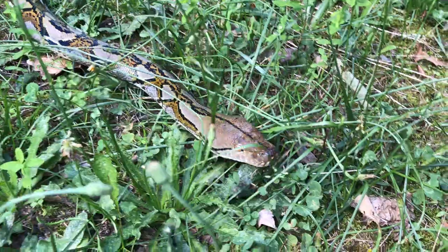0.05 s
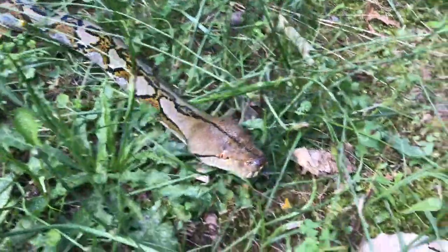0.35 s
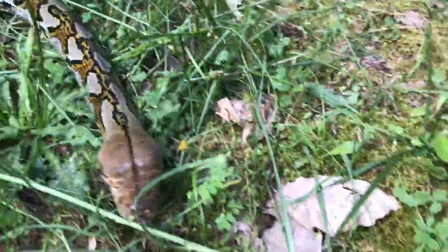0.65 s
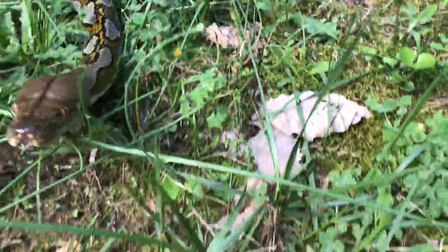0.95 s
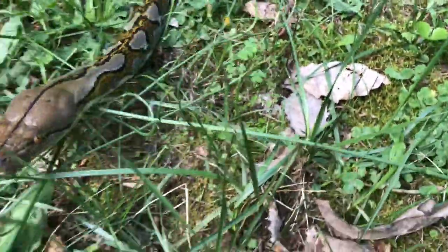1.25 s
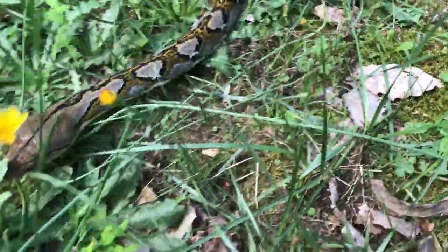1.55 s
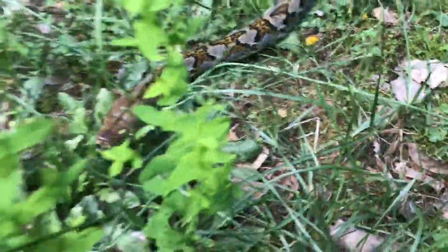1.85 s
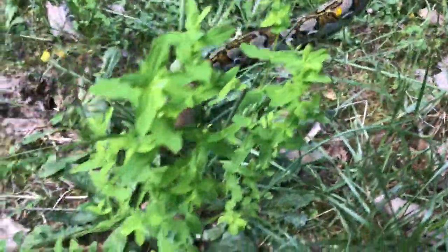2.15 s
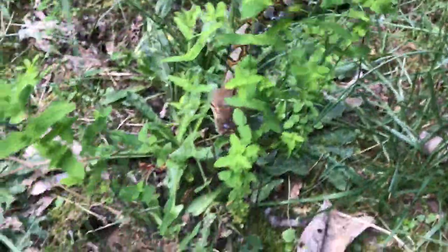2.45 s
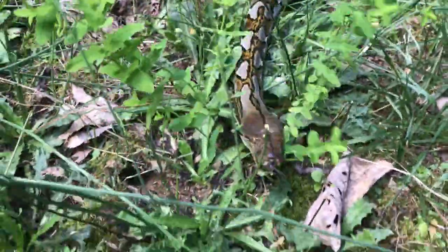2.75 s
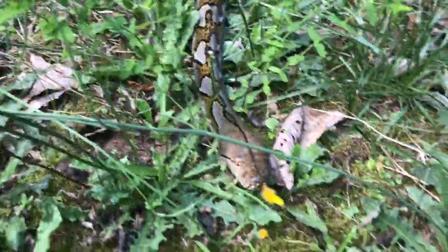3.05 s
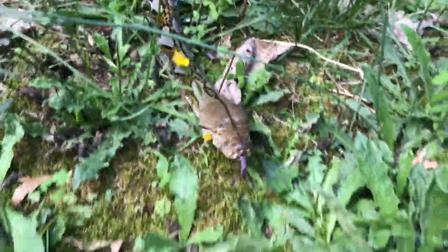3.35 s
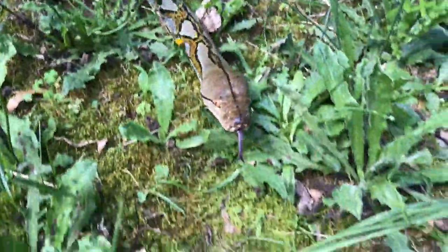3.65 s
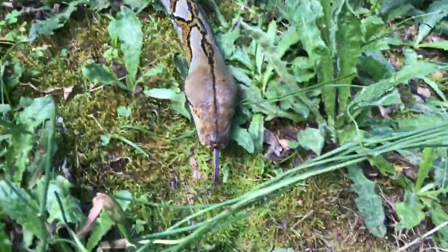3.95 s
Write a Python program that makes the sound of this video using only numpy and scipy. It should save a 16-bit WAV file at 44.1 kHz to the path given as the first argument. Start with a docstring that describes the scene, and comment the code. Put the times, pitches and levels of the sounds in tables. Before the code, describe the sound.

Grass rustles softly close by as a large snake slides along and a person walks beside it. The swishing and ticking grow louder after 1 second, and stems buckle near 1.7 seconds. Dry stalks snap in a cluster around 2.5 seconds, and a footstep crushes a dead leaf near 3.8 seconds. Faint wind, a distant engine and a low hum continue underneath, with two thin, far trills early on.

```python
"""A large snake slides through grass and dry leaves; a person walks close beside it.
From the start: faint wind, a distant engine, electrical hum; two thin far trills by 1.7 s.
Blades swish and tick, louder after 1 s; turf is pressed, green stems buckle near 1.7 s.
Dry stalks snap in a cluster around 2.5 s. Near 3.8 s one footstep crushes a dead leaf."""
import sys
import numpy as np
from scipy import signal
from scipy.fft import rfft, irfft, next_fast_len
from scipy.io import wavfile
from scipy.ndimage import map_coordinates

SR = 44100
rng = np.random.default_rng(int(sys.argv[2]) if len(sys.argv) > 2 else 0)


def inscribe(sig):
    """Save sig as 16-bit PCM at rate SR to the path in sys.argv[1].

    A 1-D sig is mono; a 2-D sig holds one channel per row.
    Samples are clipped to [-1, 1] before scaling.
    """
    pcm = np.round(np.clip(np.atleast_2d(sig).T, -1, 1) * 32767)
    wavfile.write(sys.argv[1], SR, pcm.astype(np.int16))


N = 176400

# steady sliding: t/s, level/dB
SLIDE_LEVEL = [(0, -72), (1.05, -65), (1.5, -60), (2.5, -62), (3.35, -64), (4, -60.5)]
# strokes through grass: peak t/s, half length/s, level/dB, treble gain/dB
GRASS_STROKES = [(0.49, 0.27, -67.5, 6.5), (0.853, 0.04, -65.5, 2), (1.183, 0.016, -57, -11),
                 (1.264, 0.069, -56, 1), (1.603, 0.019, -63, 12), (1.774, 0.13, -58, -3),
                 (2.087, 0.041, -52, 2), (2.304, 0.067, -54, -2), (2.373, 0.027, -54, 6),
                 (2.474, 0.041, -50.5, 2), (2.604, 0.013, -54.5, 7), (2.725, 0.05, -58, 6),
                 (3.066, 0.14, -63, 8), (3.515, 0.046, -52.5, -7), (3.57, 0.04, -52.5, 5),
                 (3.733, 0.09, -53.5, -2.5)]
# rustle spectrum: f/Hz, relative level/dB
GRASS_SPECTRUM = [(150, -74), (500, 1), (1500, -1.5), (2600, -0.5), (3800, 1.5), (4900, -2), (6300, 0.5),
                  (8200, -3), (10500, -0.5), (13500, -5), (16000, -9)]
# dry stalks and leaves breaking: t/s, level/dB, centre f/Hz, t60/s
DRY_SNAPS = [(.737, -45, 9700, 0.0044), (0.784, -49, 6500, 0.006), (0.841, -48.5, 5800, 0.0091),
             (1.3811, -48.5, 6830, 0.0046), (1.388, -43, 7400, 0.0094), (2.3092, -47, 4000, .008),
             (2.3261, -37.5, 4130, 0.012), (2.429, -43.5, 5500, .005), (2.4603, -37, 5800, 0.0061),
             (2.4682, -39, 7150, .005), (2.4746, -29.5, 12700, 0.0013), (2.4799, -38, 5460, 0.004),
             (2.511, -42, 6600, 0.0068), (2.5183, -36, 6350, 0.0077), (2.526, -37.5, 6640, 0.017),
             (2.5667, -40, 7400, 0.0035), (2.575, -37, 8800, 0.01), (2.584, -43, 7500, 0.007),
             (2.601, -39, 6550, 0.0089), (2.674, -35.5, 7800, 0.027), (2.7202, -41, 5600, 0.011),
             (2.9756, -33, 6340, .003), (3.045, -46.5, 6500, 0.0031), (3.123, -44.5, 9500, 0.0041),
             (3.197, -43.5, 10500, .009), (3.3275, -38.5, 4950, .009), (3.6718, -34, 4070, 0.041),
             (3.6745, -27, 3650, 0.011), (3.7345, -46.5, 7000, 0.011), (3.771, -28, 5340, 0.0087),
             (3.7743, -27, 7300, 0.0066), (3.782, -35, 6400, 0.022), (3.793, -31.5, 7000, 0.029),
             (3.7977, -31.5, 5900, 0.012), (3.8324, -29, 7800, 0.0092), (3.844, -34.5, 12100, 0.0081),
             (3.930, -46, 5660, 0.011), (3.987, -42, 7900, 0.008), (3.9956, -40.5, 5800, 0.0063)]
# leaves scraped or crushed: t/s, level/dB, rise/s, hold/s, release t60/s, centre f/Hz, width/oct
LEAF_CRUSHES = [(1.153, -57, 0.033, 0.15, .1, 14000, .4), (1.98, -41.5, 0.0054, 0.018, 0.041, 14100, 0.54),
                (3.755, -32.5, 0.013, 0.021, 0.19, 6260, 1.54)]
# breaking-leaf spectrum: f/Hz, relative level/dB
LEAF_SPECTRUM = [(100, -36), (470, -2.5), (1250, 9), (3000, 0), (4800, -3), (6500, -1), (8500, -4),
                 (10400, -3), (12800, 0.5), (16000, 1)]
# green stems buckling: t/s, level/dB
STEM_BUCKLES = [(1.66, -49.5), (1.677, -51.5), (1.735, -54), (1.811, -52), (1.823, -50.5)]
# twigs breaking: t/s, level/dB, f/Hz
TWIG_BREAKS = [(2.674, -43.5, 1920), (3.3277, -43.5, 4300)]
# twig modes: frequency ratio, gain/dB
TWIG_PARTIALS = [(.67, -3), (1, 9), (1.37, -12)]
# presses on turf: peak t/s, half length/s, level/dB
TURF_PRESSES = [(0.984, 0.0084, -60), (1.288, 0.033, -61), (2.393, 0.054, -59), (3.675, 0.0038, -43)]
# trill notes: t/s, length/s, level/dB
TRILL_NOTES = [(0.657, 0.16, -71.5), (1.564, 0.09, -66.5)]
# wind and far rumble spectrum: f/Hz, relative level/dB
WIND_SPECTRUM = [(22, -49), (45, -21), (90, 3), (175, 2.5), (300, -2), (430, -8.5), (900, -14.5),
                 (1700, -14), (2600, -25), (6000, -32), (16000, -28.5)]
# wind envelope: t/s, level/dB
WIND_LEVEL = [(0.5, -56), (2.4, -52), (4, -54)]
# engine firing harmonics 1 to 5: level/dB
ENGINE_HARMONICS_DB = [-61, -55.5, -58.5, -53.6, -63.5]
# electrical hum lines: f/Hz, level/dB
HUM_LINES = [(60, -64.5), (298, -68.5), (479, -70.5)]


def grass(friction_db=3, clumps_per_s=39, clump_db=1.7, crossover_hz=6600):
    """Blades rub and flick against moving bodies. Returns rustle and its low-band envelope."""
    t = np.arange(N) / SR
    low_power = high_power = amp(curve(SLIDE_LEVEL)) ** 2
    for peak_s, half_s, db, treble_db in GRASS_STROKES:
        stroke = 1 / np.cosh(np.clip((t - peak_s) / half_s, -20, 20)) ** 2
        low_power = low_power + stroke * amp(db) ** 2
        high_power = high_power + stroke * amp(db + treble_db) ** 2
    contact = amp(friction_db) * rng.standard_normal(N) + flicks()
    rustle = unit_rms(filtered(contact, lambda hz: gain_at(GRASS_SPECTRUM, hz)))
    rustle *= amp(clump_db * wobble(clumps_per_s))
    low = filtered(rustle, lambda hz: 1 / (1 + (hz / crossover_hz) ** 4))
    envelope = np.sqrt(low_power)
    return low * envelope + (rustle - low) * np.sqrt(high_power), envelope


def flicks(per_s=1500, spread_db=6.5, t60_s=.0013, top_hz=15900, candidates=12000, size=256):
    """Blades flick past one another, each ringing briefly at its own pitch."""
    place, chance, pitch = rng.random((candidates, 3)).T
    db = spread_db * np.clip(rng.standard_normal(candidates), -2, 2)
    on = chance < per_s * N / SR / candidates
    t = np.arange(size) / SR
    rings = amp(db[on, None]) * np.sin(2 * np.pi * top_hz * pitch[on, None] * t) * decay(t, t60_s)
    at = (place[on, None] * N).astype(int) + np.arange(size)
    return unit_rms(np.bincount(at.ravel(), rings.ravel(), N)[:N])


def ticks(envelope, base_per_s=34, gain_db=2.5, spread_db=2, centre_hz=6600, candidates=400):
    """Single blades spring back at random; more often and louder under a harder push."""
    out = np.zeros(N)
    push = np.sqrt(envelope / envelope.mean())
    timing, variation = rng.random((candidates, 2)), rng.standard_normal((candidates, 2))
    for (place, chance), (loud, pitch) in zip(timing, variation):
        tick = snap(centre_hz * 2 ** (pitch / 2), t60_s=.014)
        at = int(place * N)
        if chance < push[at] * base_per_s * N / SR / candidates:
            add(out, at / SR, envelope[at] * amp(gain_db + spread_db * min(loud, 2)) * tick)
    return out


def dry_leaves():
    """Single snaps; dense crackle where a whole leaf gives way."""
    out, t = np.zeros(N), np.arange(N) / SR
    for start_s, db, hz, t60_s in DRY_SNAPS:
        add(out, start_s, amp(db) * snap(hz, t60_s))
    for start_s, db, rise_s, hold_s, t60_s, hz, width_oct in LEAF_CRUSHES:
        attack = np.clip(t / rise_s, 0, 1) ** 2
        release = decay(np.maximum(t - rise_s - hold_s, 0), t60_s)
        crackle = unit_rms(leaf_filter(crush_grains(), hz, width_oct))
        add(out, start_s, amp(db) * attack * release * crackle)
    return out


def snap(centre_hz, t60_s, brittle_t60_s=.0026, bounce_s=.0015, bounce_db=-12, size=2048):
    """One fracture: crack, shiver, ground bounce. Unit rms over the first 3 ms."""
    force = rng.standard_normal(size) * decay(np.arange(size) / SR, t60_s)
    brittleness = min(1, np.sqrt(brittle_t60_s / t60_s))  # slow fractures tear rather than crack
    force[0] = 2 * amp(6) * brittleness
    add(force, bounce_s * (.5 + rng.random()), amp(bounce_db) * force)
    sound = leaf_filter(force, centre_hz, width_oct=.83)
    return sound / np.std(sound[:round(.003 * SR)])


def crush_grains(per_s=5200, spread_db=8.5):
    """Tiny random impulses of uneven size from a leaf giving way."""
    height = amp(spread_db * np.clip(rng.standard_normal(N), -2, 2))
    polarity = np.sign(rng.standard_normal(N))
    return unit_rms(height * polarity * (rng.random(N) < per_s / SR))


def leaf_filter(x, centre_hz, width_oct, skirt_db=-15, size=1024):
    """Dry-leaf response: minimum phase, emphasis around the leaf's own pitch."""
    hz = np.fft.rfftfreq(size, 1 / SR)
    gain = gain_at(LEAF_SPECTRUM, hz) * (bell(hz, centre_hz, width_oct) + amp(skirt_db))
    cepstrum = irfft(np.log(gain))
    cepstrum[1:size // 2] *= 2
    cepstrum[size // 2:] = 0
    impulse_response = irfft(np.exp(rfft(cepstrum)))
    return signal.fftconvolve(x, impulse_response)[:len(x)]


def stems():
    """Green stems buckle one by one under moving weight, each with a dull crick."""
    out = np.zeros(N)
    for start_s, db in STEM_BUCKLES:
        add(out, start_s, amp(db) * snap(centre_hz=2250, t60_s=.018))
    return out


def twigs(t60_s=.013):
    """Thicker sticks break with a short woody ring."""
    out, t = np.zeros(N), np.arange(SR // 10) / SR
    for start_s, db, hz in TWIG_BREAKS:
        ring = sum(amp(mode_db) * np.sin(2 * np.pi * hz * ratio * t) for ratio, mode_db in TWIG_PARTIALS)
        add(out, start_s, amp(db) * np.sqrt(2) * ring * decay(t, t60_s))
    return out


def turf(centre_hz=710, width_oct=.81):
    """Weight settles on moss and soil: a dull, soft crunch."""
    t = np.arange(N) / SR
    weight = sum(amp(db) * np.exp(-.5 * ((t - peak_s) / half_s) ** 2)
                 for peak_s, half_s, db in TURF_PRESSES)
    return weight * unit_rms(filtered(rng.standard_normal(N), lambda hz: bell(hz, centre_hz, width_oct)))


def scattered(x, tail_db=-10, t60_s=.028):
    """Direct sound plus a brief, weak tail off ground and plants."""
    t = np.arange(SR // 8) / SR
    tail = rng.standard_normal(len(t)) * decay(t, t60_s)
    return x + amp(tail_db) * signal.fftconvolve(x, tail / np.linalg.norm(tail))[:N]


def trill(pitch_hz=2870, waver=.009, flutter_db=2):
    """Short thin notes, probably a far cricket."""
    gate = np.zeros(N)
    for start_s, length_s, db in TRILL_NOTES:
        add(gate, start_s, amp(db) * signal.windows.tukey(int(length_s * SR), .25))
    return gate * amp(flutter_db * wobble(120)) * tone(pitch_hz * (1 + waver * wobble(200)))


def wind():
    """Faint wind and far rumble: low noise, one slow swell."""
    noise = filtered(rng.standard_normal(N), lambda hz: gain_at(WIND_SPECTRUM, hz))
    return amp(curve(WIND_LEVEL)) * unit_rms(noise)


def engine(mean_hz=42.54, drift=.0064, flutter_db=2):
    """Far engine at near-steady speed: harmonics of the firing rate."""
    firing_hz = mean_hz * (1 + drift * wobble(5.1))
    return sum(amp(db + flutter_db * wobble(12)) * tone(k * firing_hz)
               for k, db in enumerate(ENGINE_HARMONICS_DB, 1))


def hum(flutter_db=1.6):
    """Electrical hum: constant pitches, wavering levels."""
    return sum(amp(db + flutter_db * wobble(4.29)) * tone(np.full(N, hz)) for hz, db in HUM_LINES)


def amp(db):
    return 10 ** (np.asarray(db) / 20)


def unit_rms(x):
    return x / np.sqrt(np.mean(x ** 2) + 1e-20)


def decay(t, t60_s):
    return np.exp(-np.log(1000) * t / t60_s)


def gain_at(spectrum, hz):
    """Linear gain from (f/Hz, level/dB) rows, interpolated on log f."""
    knots_hz, db = np.transpose(spectrum)
    return amp(np.interp(np.log(hz + 1), np.log(knots_hz + 1), db))


def bell(hz, centre_hz, width_oct):
    """Gaussian on the octave axis."""
    return np.exp(-.5 * (np.log2((hz + 1) / centre_hz) / width_oct) ** 2)


def curve(rows):
    """(t/s, value) rows interpolated per sample."""
    return np.interp(np.arange(N) / SR, *np.transpose(rows))


def wobble(knots_per_s):
    """Smooth random curve."""
    return map_coordinates(rng.standard_normal(1024), [np.arange(N) * knots_per_s / SR], mode="mirror")


def tone(hz):
    """Unit-rms sine on a pitch curve."""
    return np.sqrt(2) * np.sin(2 * np.pi * (np.cumsum(hz) / SR + rng.random()))


def filtered(x, response):
    """Zero-phase filter with gain response(hz)."""
    size = next_fast_len(N + SR // 2)
    return irfft(rfft(x, size) * response(np.fft.rfftfreq(size, 1 / SR)), size)[:N]


def add(track, start_s, sound):
    part = track[max(round(start_s * SR), 0):][:len(sound)]
    part += sound[:len(part)]


def scene():
    """Close rustle and crackle over the distant background; mono."""
    rustle, envelope = grass()
    background = wind() + engine() + hum() + trill()
    presses = turf()
    crackle = dry_leaves() + stems() + twigs() + ticks(envelope)
    return (rustle + scattered(crackle) + presses + background)[None]


def record(dry, open_s=.083, dip_db=-4, dip_hz=10530, dip_width_oct=.066, top_hz=15900):
    """Microphone: narrow treble dip, opens just after the start, band-limited."""
    heard = filtered(dry[0], lambda hz: amp(dip_db * bell(hz, dip_hz, dip_width_oct)))
    heard *= np.arange(N) / SR > open_s
    return filtered(heard, lambda hz: hz < top_hz)[None]


dry = scene()
out = record(dry)
inscribe(out)
```